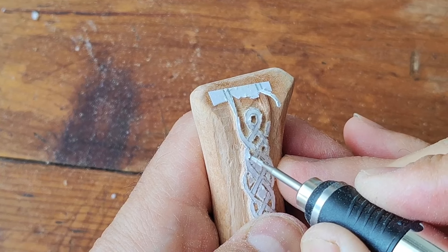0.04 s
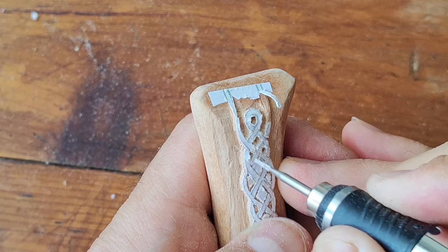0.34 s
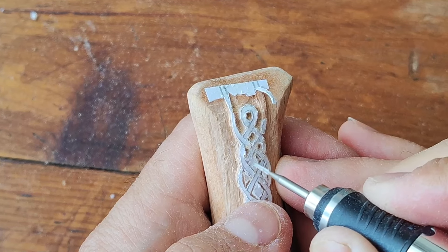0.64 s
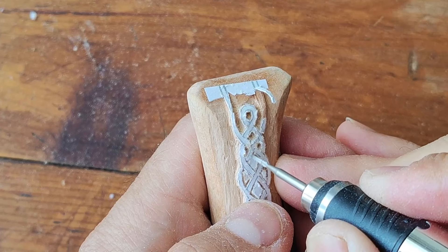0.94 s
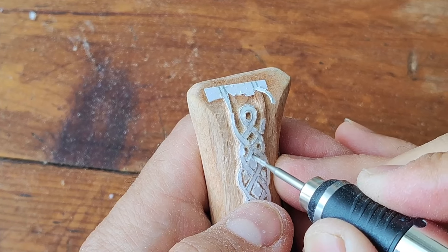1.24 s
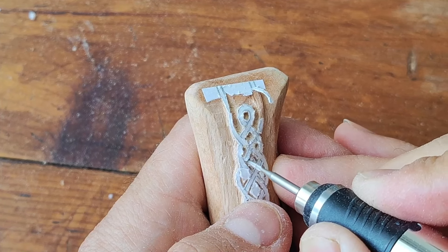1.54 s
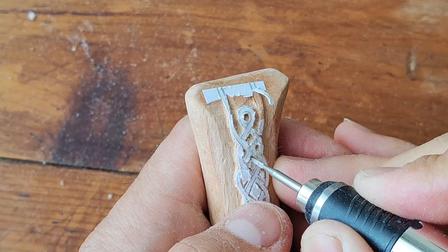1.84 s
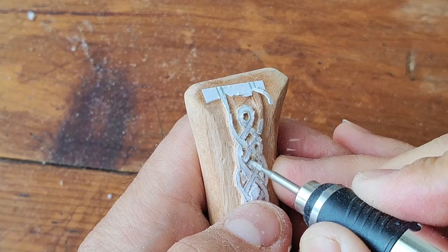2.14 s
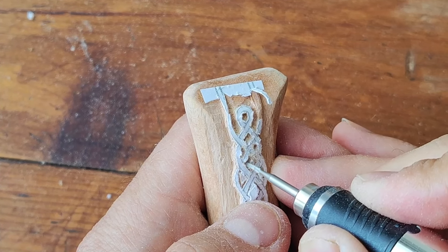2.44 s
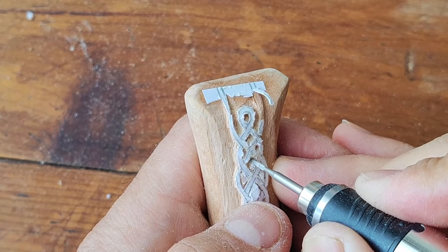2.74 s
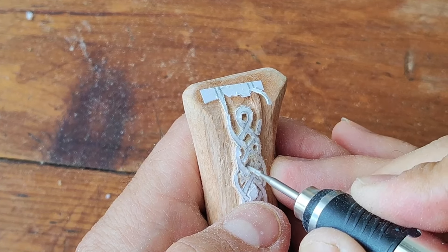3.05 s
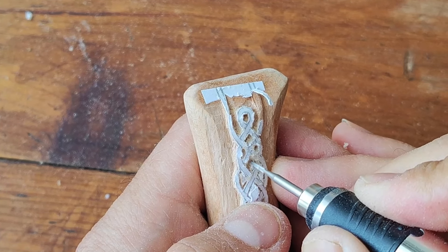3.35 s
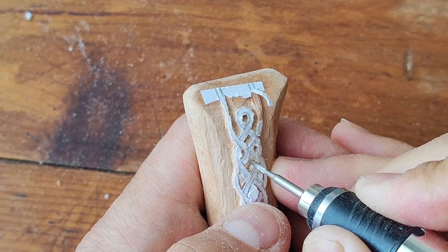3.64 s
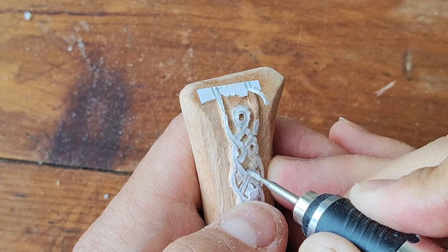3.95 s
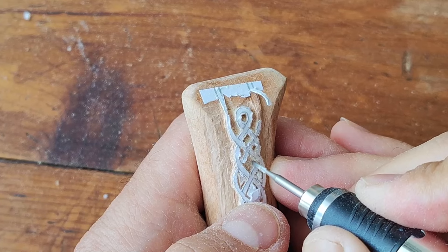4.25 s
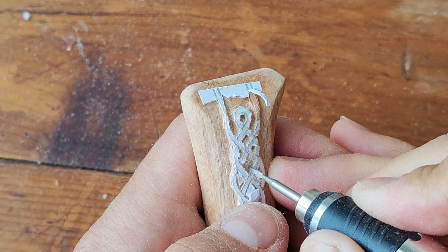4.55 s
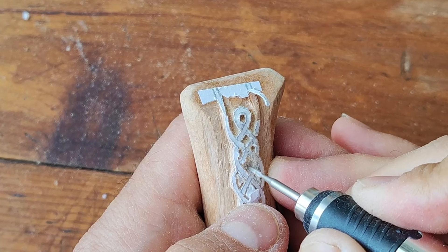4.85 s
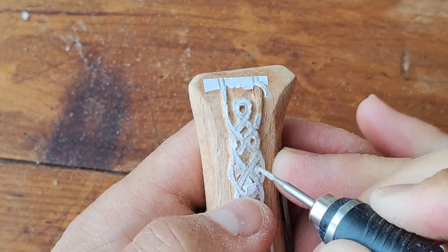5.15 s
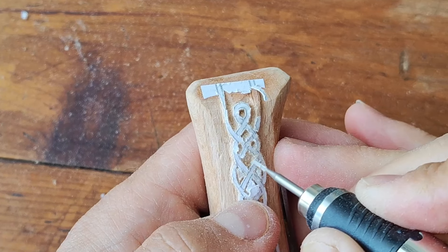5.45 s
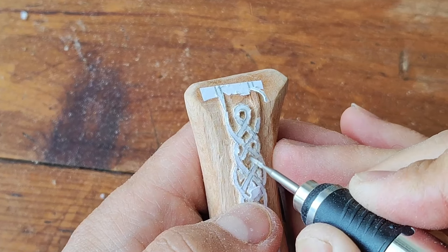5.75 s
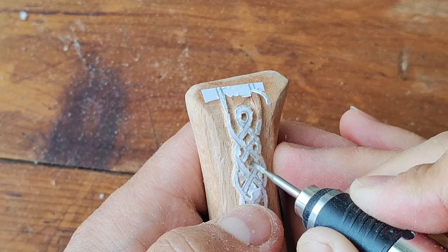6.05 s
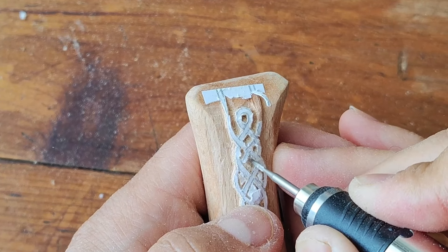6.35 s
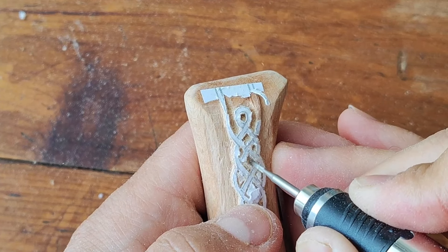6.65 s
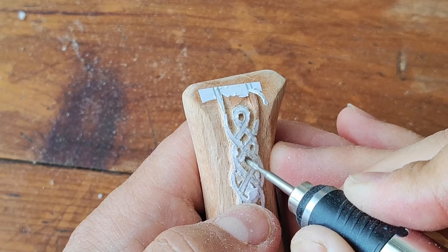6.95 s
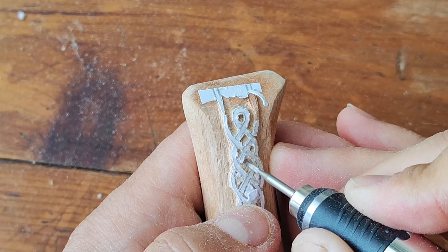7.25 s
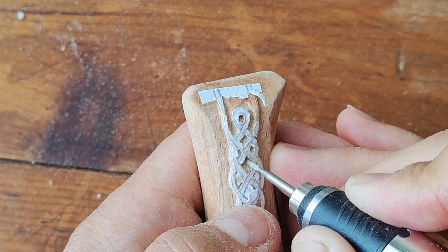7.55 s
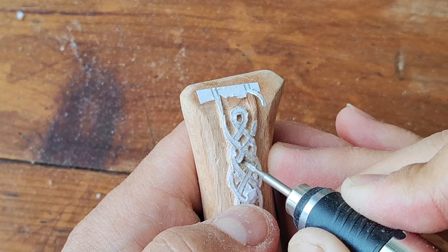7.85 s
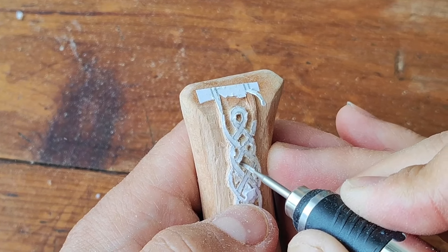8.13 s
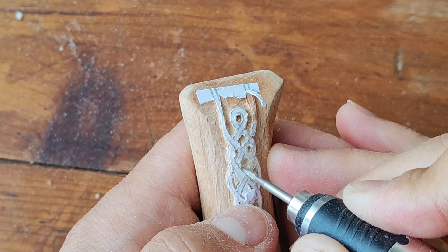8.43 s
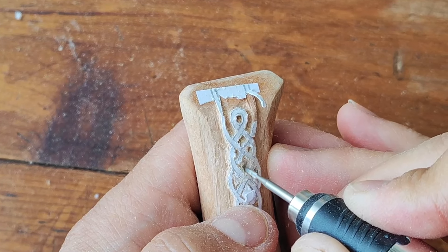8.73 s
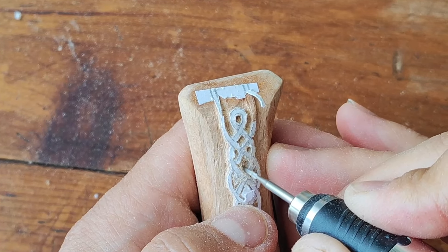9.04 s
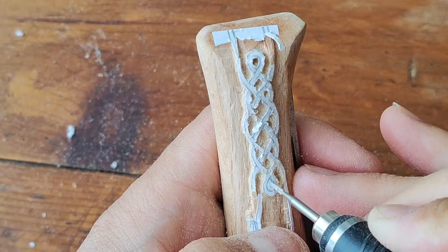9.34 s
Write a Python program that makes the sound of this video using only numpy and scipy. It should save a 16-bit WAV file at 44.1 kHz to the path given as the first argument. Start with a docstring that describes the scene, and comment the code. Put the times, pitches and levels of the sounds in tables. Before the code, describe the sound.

A small rotary engraving tool whines close by as its tiny bit carves a hand-held wooden handle. After a brief cut and a moment of idling, a long run of quick, buzzing, rasping strokes follows, each dipping the pitch slightly. Midway the tool idles a little higher while hands brush softly over the table twice. Then the cutting resumes in short, more scattered strokes. The room is quiet.

```python
"""Engraving pen on wood

A small rotary pen carves a hand-held wooden handle, close above a table. The burr strikes the wood
on every turn of the shaft; deep cuts drag the motor down and make the handle buzz. Between strokes
the motor idles with a beating bearing whine, and once the hands slide over the table to shift grip."""
import sys
import numpy as np
from scipy import signal
from scipy.fft import rfft, irfft
from scipy.io import wavfile
from scipy.ndimage import uniform_filter1d

SR = 44100
rng = np.random.default_rng(int(sys.argv[2]) if len(sys.argv) > 2 else 0)


def transcribe(signal):
    """Save signal, clipped to [-1, 1], as a 16-bit WAV file at the path in sys.argv[1]."""
    frames = np.atleast_2d(signal).T
    limited = np.clip(frames, -1, 1)
    pcm = np.round(limited * 32767).astype(np.int16)
    wavfile.write(sys.argv[1], SR, pcm)


N = 418509
TIME = np.arange(N) / SR
BINS = np.fft.rfftfreq(4096, 1 / SR)


def amp(db):
    """Decibels to gain."""
    return 10 ** (np.asarray(db) / 20)


def unit(x):
    """Scales to an rms of one."""
    return x / np.sqrt(np.mean(x ** 2) + 1e-20)


def on_bins(points):
    """A curve over BINS, drawn through points on a log-frequency axis."""
    hz, value = np.transpose(points)
    return np.interp(np.log(BINS + 1), np.log(hz), value)


def drift(per_s):
    """Random modulation of unit rms, gliding to per_s new values a second."""
    knots = rng.standard_normal(4096)
    return unit(np.interp(TIME * per_s, np.arange(len(knots)), knots))


def colour(x, gain):
    """Minimum-phase EQ with the given gain on BINS; the result has unit rms."""
    log_gain = np.log(np.maximum(gain, 1e-5))
    mirrored = np.concatenate([log_gain, log_gain[-2:0:-1]])
    taps = np.fft.ifft(np.exp(np.conj(signal.hilbert(mirrored)))).real
    return unit(signal.oaconvolve(x, taps)[:N])


def body(modes):
    """EQ curve of steep resonances, each (centre [Hz], width [Hz], level [dB])."""
    peaks = (amp(db) / (1 + (2 * (BINS - hz) / width) ** 2) for hz, width, db in modes)
    return np.sqrt(sum(peak ** 2 for peak in peaks))


def noise(spectrum):
    """Steady noise with a given spectrum."""
    return colour(rng.standard_normal(N), amp(on_bins(spectrum)))


def swells(rows):
    """Envelope of smooth, bell-shaped touches."""
    return sum(amp(db) * np.exp(-((TIME - s) / width) ** 2) for s, db, width in rows)


def add(mix, s, sound):
    """Mixes a sound in at s seconds."""
    part = mix[..., max(round(s * SR), 0):][..., :sound.shape[-1]]
    part += sound[..., :part.shape[-1]]


def stroke(length, db, swell_db, bite_s=0.019, lift_s=0.017):
    """The burr digs in, swells or fades, and comes free: its force, and a gate while it is held."""
    t = np.arange(0, length + 10 * lift_s, 1 / SR)
    shape = np.minimum(t / bite_s, 1) * np.exp(-np.maximum(t - length, 0) / lift_s)
    return shape * amp(db + swell_db * (np.minimum(t / length, 1) - .5)), t < length


# Cue list of cuts: (time [s], length [s], burr level [dB], swell over the stroke [dB], drag [turns/s],
# handle against burr [dB], shank against burr [dB], roughness [0 clean to 1 ragged])
BURR_STROKES = [(0.0, 0.11, -42, -12, 11.5, -4.6, -5.5, 0.6), (1.061, 0.14, -48, 2, 4, -3.5, -4.1, 0.38),
                (1.202, 0.069, -42.5, -7, 12.5, -1.5, -4, 0.42),
                (1.28, 0.06, -39, -7, 12, -3.5, -8.5, 0.36), (1.352, 0.11, -46.5, 3, 6, -2, -8, 0.11),
                (1.466, 0.097, -39, -9, 10.5, -7, -7.5, 0.28),
                (1.565, 0.12, -39, -10.5, 14.5, -6, -6.8, 0.5),
                (1.681, 0.096, -40, -2, 19.5, -3.5, -4.9, 0.88),
                (1.778, 0.13, -35.5, -0.5, 30.5, -4.5, -3.5, 0.35),
                (1.908, 0.099, -36.0, 5, 46, -4, -4, 0.19),
                (2.009, 0.069, -33.5, -1.5, 11, -4.5, -8.5, 0.34),
                (2.078, 0.096, -38.5, -14, 3, -6.5, -7, 0.55), (2.164, 0.059, -35, 0, 8, -6.5, -9.9, 0.5),
                (2.219, 0.047, -35.5, -0.5, 29.5, -7, -4, 0.81), (2.288, 0.12, -33, -2, 20.5, -7, -9, 0.3),
                (2.406, 0.14, -35, 1.5, 30.5, -3.5, -1.8, 0.18),
                (2.549, 0.15, -38, -4.8, 9.5, -10.8, -9.6, 0.29),
                (2.69, 0.099, -35, 2.5, 20.5, -6.5, -5, 0.71), (2.797, 0.12, -36, 2.5, 22.5, -7, -6, 0.15),
                (2.918, 0.1, -38.5, -0.5, 41, 0.8, 1, 0.15), (3.016, 0.1, -36.5, 4, 32.5, 0, -0.2, 0.055),
                (3.125, 0.11, -36, -8, 19.5, -4, -6.5, 0.56),
                (3.231, 0.071, -34.5, -5, 11, -10.1, -6.9, 0.82),
                (3.31, 0.12, -35.5, -8.5, 12, -13, -7, 0.69),
                (3.431, 0.12, -35.5, -6.5, 21.5, -7.5, -6, 0.17),
                (3.56, 0.095, -35.5, -5, 20.5, -6, -7.5, 0.33),
                (3.645, 0.15, -36, -0.5, 31, -2.5, -1.6, 0.28),
                (3.792, 0.12, -37, 0.1, 47.0, -1.0, -4.5, 0.05),
                (3.918, 0.099, -39.5, -2.5, 30.5, 2, -1.5, 0.22),
                (4.04, 0.076, -39.5, -6.5, 16.5, -8, -5.5, 0.32),
                (4.164, 0.21, -45.8, 2, 3, -3.5, -4, 0.58), (4.368, 0.032, -38, 6.5, 12.5, -4.5, -5, 0.5),
                (4.422, 0.11, -37.5, -2, 13, -2.5, -4.5, 0.24),
                (4.524, 0.054, -33.6, -5, 22, -3.5, -3.8, 0.37),
                (4.57, 0.11, -37.5, 5.5, 10.5, -4.5, -8.2, 0.053),
                (4.689, 0.066, -36.5, -7.5, 11, -6.4, -6, 0.37),
                (4.783, 0.093, -38, -5.5, 13.5, -7.4, -7, 0.61),
                (4.882, 0.13, -46, -5.5, 11, 0.8, -2.5, 0.59), (5.93, 0.13, -45.5, 3.5, 4, -2, -4.5, 0.36),
                (6.056, 0.093, -36.5, -5, 21, -6, -6.5, 0.69),
                (6.287, 0.067, -39.5, -4, 15.5, -4.5, -0.5, 0.66),
                (6.354, 0.083, -36, 1, 42.5, -7, -4, 0.55), (6.437, 0.11, -43.5, -9, 22.5, -3.6, -7, 0.69),
                (6.54, 0.083, -45, -9.5, 0.0, -5, -2.5, 0.73), (6.62, 0.063, -37, -1, 19, -4.5, -5, 0.72),
                (6.676, 0.053, -33, 0, 23, -7.5, -9, 0.35), (6.79, 0.048, -35, -4, 12, -9, -7.5, 0.39),
                (6.838, 0.1, -39, -1.5, 16.5, -6.5, -7, 0.42), (6.961, 0.091, -46.5, -2, 8, -3.9, -4, 0.98),
                (7.037, 0.098, -37.5, 1.5, 26, -4.5, -5.5, 0.28),
                (7.265, 0.086, -41, 12, 10, -3.5, -4.5, 0.38), (7.481, 0.12, -44, -11, 8.5, -5, -3.5, 0.48),
                (7.737, 0.043, -39, 0, 9, -5, -5, 0.67), (7.953, 0.112, -37.5, -4, 28, -4.5, -2, 0.43),
                (8.201, 0.098, -38.5, -8, 27, -3.5, -3.5, 0.35),
                (8.313, 0.079, -46, -17, 6.0, -6, -7.5, 0.55), (8.395, 0.061, -41, -5, 6, -3.5, -3.5, 0.67),
                (8.453, 0.086, -38.5, -6, 26.0, -5.5, -2, 0.55),
                (8.528, 0.132, -43, -8, 20, -3.2, -4, 0.97),
                (8.654, 0.094, -41.0, 0.5, 9.5, -2, -5.5, 0.57), (8.744, 0.093, -38, -6, 32, -5, -3, 0.5),
                (8.847, 0.052, -34.5, 1.1, 5.5, -13, -11.5, 0.68),
                (8.903, 0.11, -43.5, -7, 7.5, -4.5, -3.5, 0.47),
                (9.021, 0.12, -33.8, 0.5, 17, -8.5, -8.5, 0.25),
                (9.164, 0.037, -34, -8, 11.5, -8.5, -10.5, 0.15), (9.26, 0.2, -46, 0, 5.5, -3, -1.5, 0.53)]
def contact(grain_db=2.5):
    """Burr meets grain: handle, shank and burr envelopes, drag, and the stronger stroke's roughness."""
    power, (drag, torn) = np.zeros((3, N)), np.zeros((2, N))
    for s, length, db, swell_db, stroke_drag, handle_db, shank_db, roughness in BURR_STROKES:
        force, held = stroke(length, db, swell_db)
        add(power, s, np.outer(amp([handle_db, shank_db, 0]), force) ** 2)
        add(drag, s, stroke_drag * held)
        add(torn, s, roughness * force ** 2)
    rough = np.clip(torn / (power[2] + 1e-12), 0, 1)
    grain = amp(grain_db * rough * drift(40))  # wood grain makes a rough cut uneven
    return np.sqrt(power) * grain, drag, rough


# Pitch curve of the unloaded shaft, flagging over long runs of cuts: (time [s], speed [turns/s])
IDLE_SPEED = [(0, 299.8), (0.2, 304.5), (0.55, 309.4), (1.1, 308), (2.1, 308), (4.3, 299), (5.0, 294),
              (5.25, 321), (5.9, 323.5), (6.6, 304), (8.2, 304.5), (9.49, 312)]
def shaft_turns(drag, rough, inertia_s=0.055):
    """Turns made so far: drag pulls the rotor below its free speed, in jerks where the wood tears."""
    pole = np.exp(-1 / (inertia_s * SR))
    sag = signal.lfilter([1 - pole], [1, -pole], drag)
    speed = np.interp(TIME, *np.transpose(IDLE_SPEED)) - sag
    jerks = 1 + (.001 + .007 * rough) * drift(45)
    return np.cumsum(speed * jerks) / SR


def once_a_turn(turns, size=4):
    """A sharp click as each turn completes, timed between samples."""
    at = np.flatnonzero(np.diff(np.floor(turns)) > 0)
    late = (np.floor(turns[at + 1]) - turns[at]) / (turns[at + 1] - turns[at])
    out = np.zeros(N)
    for k in range(1 - size, size + 1):
        out[np.clip(at + k, 0, N - 1)] += np.sinc(k - late) * np.sinc((k - late) / size)
    return out


def rasp(turns, floor, decay_turns=0.5):
    """Noise that flares once a turn and falls back towards a floor."""
    return unit((floor + np.exp(-(turns % 1) / decay_turns)) * rng.standard_normal(N))


def teeth(turns, rough, step_db=-9):
    """The burr runs off centre: one tooth hits hardest, two follow; all skid more in a rough cut."""
    gap_turns = 0.267 + .02 * drift(5)  # the angle to the groove wanders
    out = np.zeros(N)
    for k in range(3):
        skid = rough * (.03 * drift(45) + .012 * drift(300))
        strength = amp(k * step_db + 2 * drift(20)) * (1 + .6 * rough * drift(250))
        out += strength * once_a_turn(turns - k * gap_turns - skid)
    return unit(out)


def ring(strikes, chips, torn, modes, flutter_db, detune):
    """Strikes and tearing fibres ring one part; shifting contact crossfades a flat and a sharp tuning."""
    torn = np.clip(torn, 0, 1)
    drive = np.sqrt(1 - torn) * strikes + np.sqrt(torn) * chips
    firm = .5 + .5 * np.tanh(drift(18))
    loose, tight = (colour(drive, body([(hz * k, width, db) for hz, width, db in modes]))
                    for k in (1 - detune, 1 + detune))
    ringing = (1 - firm) * loose + firm * tight
    power = uniform_filter1d(uniform_filter1d(ringing ** 2, size=700), size=700)
    levelled = ringing / np.sqrt(abs(power) + 1e-9)
    return levelled * amp(flutter_db * drift(40))


# Woody handle, midrange shank and bright burr resonances: (centre [Hz], width [Hz], relative level [dB])
HANDLE_MODES = [(263.5, 20, -2), (578, 72, -8.5), (862, 140, 4), (1117, 148, 5.5), (1398, 264, 9.5)]
SHANK_MODES = [(2010, 360, 1.3), (2277, 560, 0.52), (2810, 720, -1.4)]
BURR_MODES = [(3816, 396, -0.5), (4820, 1100, -3.5), (5784, 433, 0.5), (6530, 1060, -2), (9360, 1850, -18),
              (12140, 3800, -26)]
def cutting(turns, handle, shank, burr, rough):
    """The burr rings the handle, the shank and itself: steady in a clean cut, fluttering when ragged."""
    strikes = teeth(turns, rough)
    chips = rasp(turns, floor=0.15) * amp(2.5 * drift(200))
    flutter_db = .8 + 1.6 * rough
    cut = handle * ring(strikes, chips, .35 * rough ** 2, HANDLE_MODES, flutter_db, detune=.02)
    cut += shank * ring(strikes, chips, .65 * rough ** 2, SHANK_MODES, flutter_db / 2, detune=.05)
    tip = ring(strikes, chips, .9 * rough ** 1.5, BURR_MODES, flutter_db / 2, detune=.06)
    fibre_fizz = amp(-15.5) * np.sqrt(rough) * colour(chips, body([(11640, 10500, 0)]))
    bite = catches(decay_s=0.007, gain_db=-10.5)
    cut += (burr + bite) * (tip + fibre_fizz) + splinters()
    low_cut = signal.butter(3, 190, "highpass", fs=SR, output="sos")  # small parts radiate no bass
    return signal.sosfilt(low_cut, cut)


def whine(turns, partials, waver_db, waver_turns):
    """Wavering partials locked to the shaft, in step so that they beat together."""
    turns = turns + waver_turns * drift(40)
    return unit(sum(amp(db + waver_db * drift(25)) * np.cos(2 * np.pi * k * turns) for k, db in partials))


# Motor tone, and balls passing in the bearing: (pitch [x shaft speed], relative level [dB])
SHAFT_PARTIALS = [(1, -2.5), (2, -4), (3, -3), (4, 0.5), (5, -6.5), (6, -1.5), (7, -12), (8, -14), (9, -9)]
BEARING_PARTIALS = [(2.13, -21), (3.129, -2.5), (4.131, 1.5), (5.129, -9)]
# EQ of the brushes' whirr: (frequency [Hz], relative level [dB])
WHIRR_EQ = [(100, -116), (220, 2.5), (450, -10), (750, -10), (1100, 1), (1700, -8.5), (2400, 2.5),
            (3300, -0.5), (3700, 5.5), (4700, -1.5), (5800, 6), (7000, 1.5), (8400, -17.5), (14000, -12)]
def motor(turns, force, beats_per_turn=0.13):
    """Shaft and bearing sing through the housing; brushes whirr and chatter. The cut damps the shaft."""
    load = np.clip(force * amp(46.5), 0, 1)
    shaken = turns + 0.05 * load * drift(30)  # side load makes the tones unsteady
    shaft = whine(shaken, SHAFT_PARTIALS, waver_db=1, waver_turns=.006)
    bearing = whine(shaken, BEARING_PARTIALS, waver_db=.8, waver_turns=.008)
    housing = 1 + body([(930, 120, 4.2)])
    tone = amp(-52 - 3 * load) * colour(shaft + bearing, housing)
    brushes = rasp(turns, floor=1) + 0.65 * unit(once_a_turn(turns))
    # the bearing slips against the shaft, and the brushes throb with it
    throb = amp(1.24 * np.cos(2 * np.pi * beats_per_turn * turns) + 1.03 * drift(64))
    knocks = once_a_turn(turns + .012 * drift(110)) * (1 + .35 * drift(110))
    chatter = amp(-60) * colour(knocks * throb, body([(1300, 600, -2), (2400, 1700, -2)]))
    whirr = amp(-52 - 2 * load) * colour(brushes * throb, amp(on_bins(WHIRR_EQ)))
    return tone + chatter + whirr


# EQ of the background bed: (frequency [Hz], relative level [dB])
ROOM_EQ = [(20, -16), (100, -15.5), (200, -1), (1500, -14)]
def room_tone():
    """A quiet room: wide, faintly flickering noise with a weaker centre."""
    centre = noise(ROOM_EQ)
    wide = np.array([noise(ROOM_EQ), noise(ROOM_EQ)])
    return amp(-73) * (centre + 2.1 * wide) * amp(drift(56))


# Bump cues: (time [s], level [dB], half-width [s])
HAND_BUMPS = [(1.58, -67, 0.039), (4.25, -73, 0.52), (5.125, -58, 0.066), (5.735, -55.5, 0.041),
              (9.38, -69, 0.097)]
# Their dull EQ: (frequency [Hz], relative level [dB])
BUMP_EQ = [(20, -11), (90, 3), (190, 8), (300, 6.5), (1200, -28)]
def hand_bumps():
    """The hands bump softly: swells of low noise."""
    return swells(HAND_BUMPS) * noise(BUMP_EQ)


# Accents where the burr catches an edge: (time [s], level before gain_db [dB])
EDGE_CATCHES = [(2.3107, -22), (3.245, -30), (4.121, -25.5), (4.378, -27), (4.434, -27), (6.799, -35),
                (7.9601, -38), (8.2101, -29)]
def catches(decay_s, gain_db):
    """Envelope of the burr catching edges: instant attack, fast decay."""
    return sum(amp(db + gain_db) * (TIME >= s) * np.exp(-abs(TIME - s) / decay_s)
               for s, db in EDGE_CATCHES)


def splinters():
    """A splinter cracks off at each catch: a tiny burst of bright noise."""
    crack = colour(rng.standard_normal(N), np.sqrt(body(BURR_MODES)))
    return catches(decay_s=0.0006, gain_db=-8) * crack


# Slide cues: (time [s], level [dB], half-width [s])
HAND_SLIDES = [(5.116, -43, 0.049), (5.65, -48.5, 0.058)]
# EQ of skin on the table: (frequency [Hz], relative level [dB])
SKIN_EQ = [(60, -21), (150, -16), (550, -4.5), (900, -2), (1400, 2), (2300, -12), (6000, -36)]
def hand_slides():
    """Skin rubs over the table in short, grainy swishes."""
    return swells(HAND_SLIDES) * noise(SKIN_EQ) * amp(2 * drift(120))


# Stereo phase: (frequency [Hz], left lead [rad])
STEREO_PHASE = [(600, 0.64), (1200, -2.1), (1850, -1.3), (2700, 2.02), (3500, 1.2), (4150, 1.06), (4900, 2),
                (5350, 0.5), (6250, 1.62), (6800, 1.5), (7400, -1), (9500, 4.5)]
# Stereo balance: (frequency [Hz], left minus right [dB])
STEREO_BALANCE = [(400, 1), (1300, -2), (4400, 0.5), (8000, 2.5), (14000, 5.5)]
# Reflections off table, hands and room: (frequency [Hz], send level before wet_db [dB])
REFLECTION_EQ = [(250, -11), (800, -11), (1700, -5), (4500, -4), (9000, -1)]
def mic_ports(x, wet_db, t60_s, moves_per_s, size=4096):
    """Two microphone ports hear the direct sound out of step; quick reflections shift as hands move."""
    sides = np.array([[1], [-1]])
    t = np.arange(size) / SR
    direct = np.exp(.5j * sides * on_bins(STEREO_PHASE))
    wet = amp(on_bins(REFLECTION_EQ) + wet_db)
    balance = amp(sides * on_bins(STEREO_BALANCE) / 2)
    mono_power = abs((balance * direct).mean(0)) ** 2 + wet ** 2 * (balance ** 2).mean(0) / 2
    gain = balance / np.sqrt(mono_power)

    def through(response):
        """The sound along one set of paths."""
        lead = size // 16
        taps = np.roll(irfft(gain * response), lead, axis=1)
        return signal.oaconvolve(x[None], taps, axes=1)[:, lead:lead + N]

    faders = np.array([drift(moves_per_s) for _ in range(4)])
    faders /= np.linalg.norm(faders, axis=0)
    out = through(direct)
    for fader in faders:
        ahead, aside = rng.standard_normal((2, size)) * amp(-60 * t / t60_s) * (t > .0005)
        echoes = ahead + sides * aside
        out += fader * through(wet * rfft(echoes / np.linalg.norm(echoes[0])))
    return out


def scene():
    """One shaft drives burr and motor; the cut sits wetter than motor and hands, over room tone."""
    (handle, shank, burr), drag, rough = contact()
    turns = shaft_turns(drag, rough)
    room = room_tone()
    cut = cutting(turns, handle, shank, burr, rough)
    cut_bus = mic_ports(cut, wet_db=2, t60_s=.05, moves_per_s=19)
    motor_and_hands = motor(turns, handle + burr) + hand_slides() + hand_bumps()
    close_bus = mic_ports(motor_and_hands, wet_db=-2.5, t60_s=.059, moves_per_s=7)
    return cut_bus + close_bus + room


def record(dry, cutoff_hz=14380):
    """A steep low-pass trims the top of the mix."""
    taps = signal.firwin(511, cutoff_hz, window=("kaiser", 9), fs=SR)
    return signal.oaconvolve(dry, taps[None], "same")


dry = scene()
out = record(dry)
transcribe(out)
```